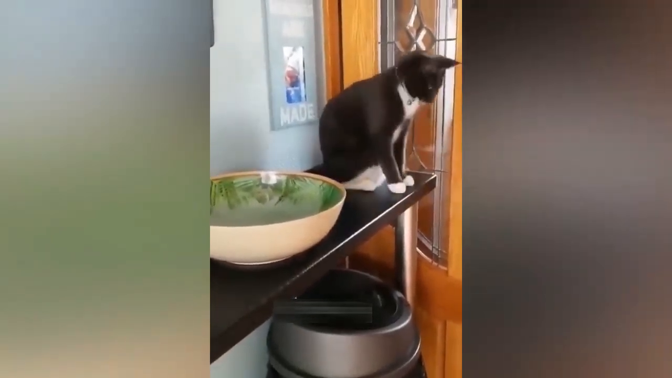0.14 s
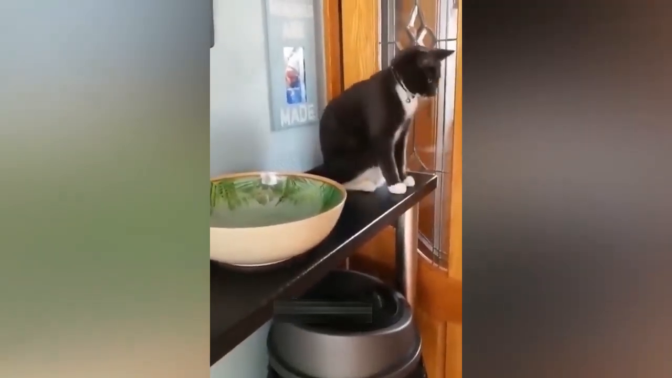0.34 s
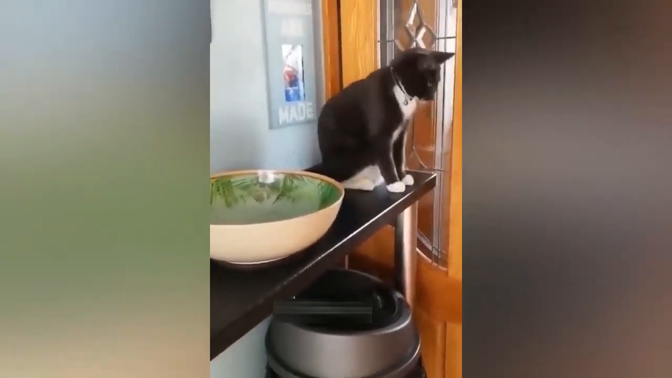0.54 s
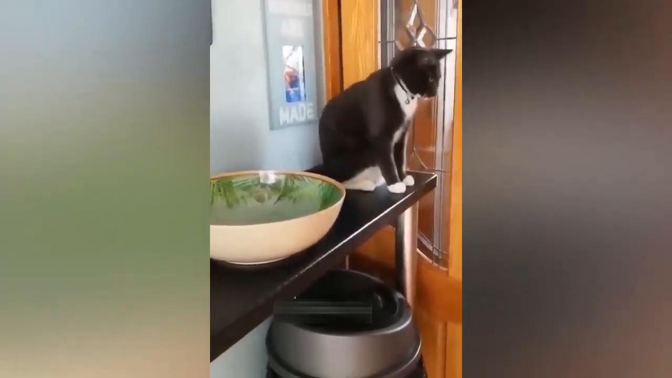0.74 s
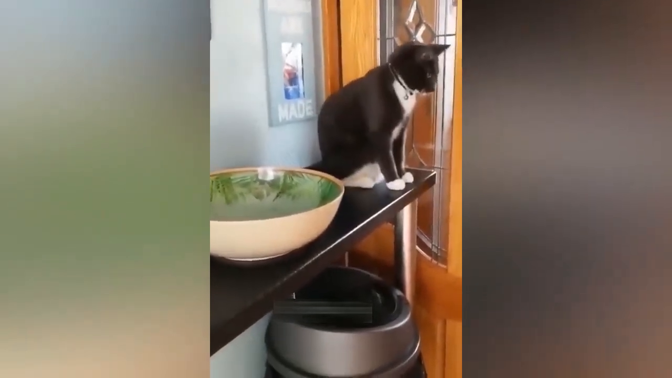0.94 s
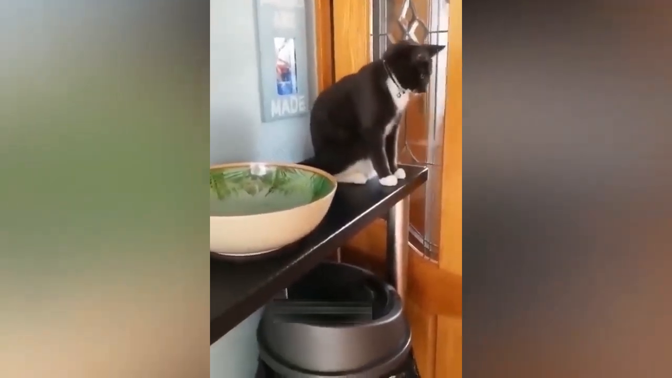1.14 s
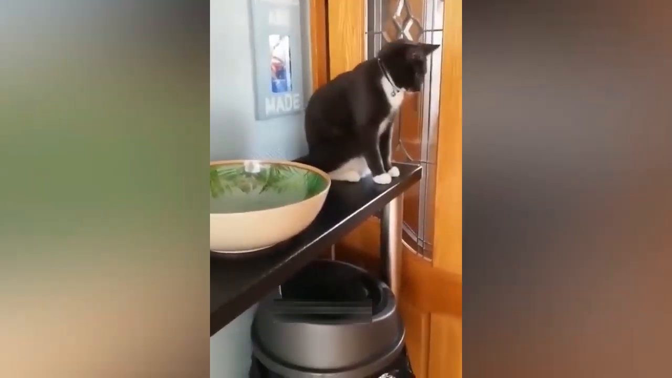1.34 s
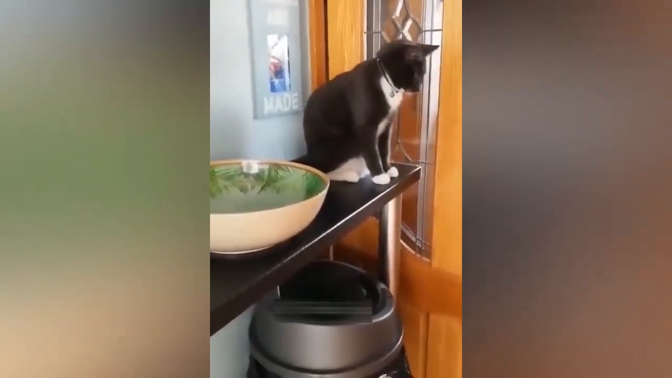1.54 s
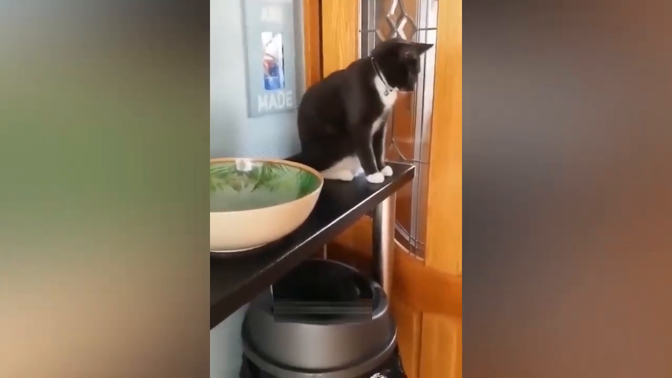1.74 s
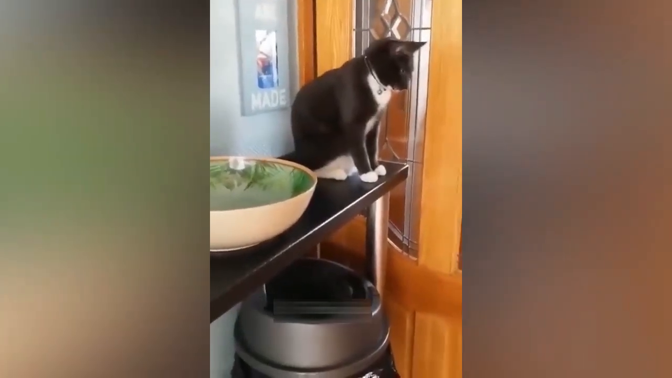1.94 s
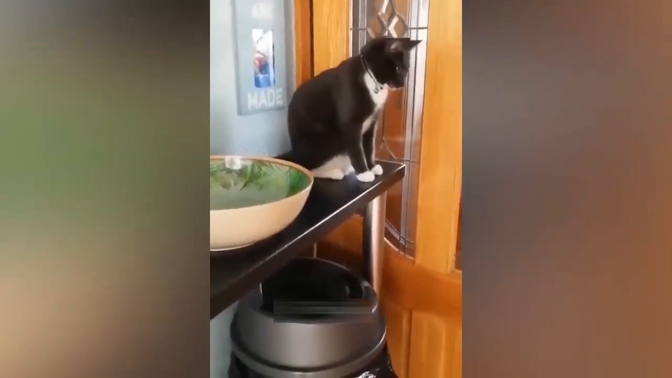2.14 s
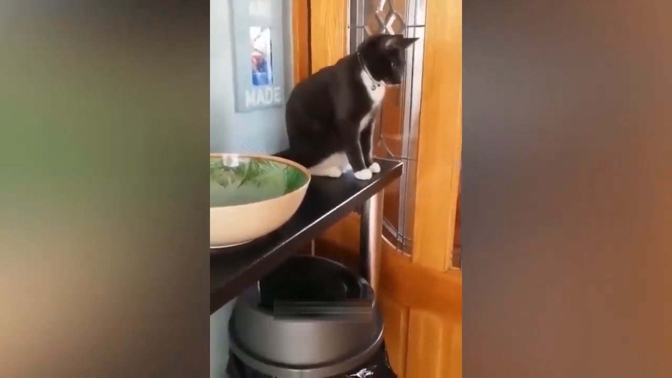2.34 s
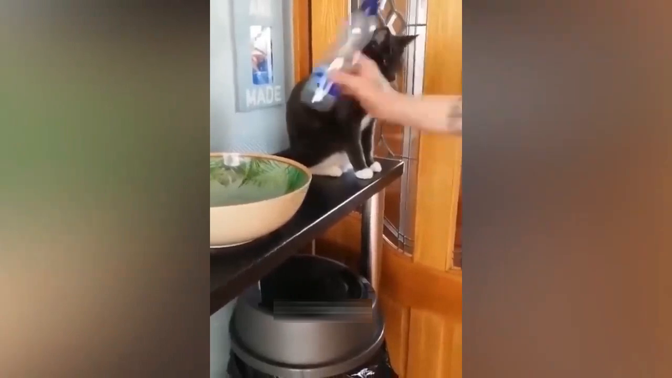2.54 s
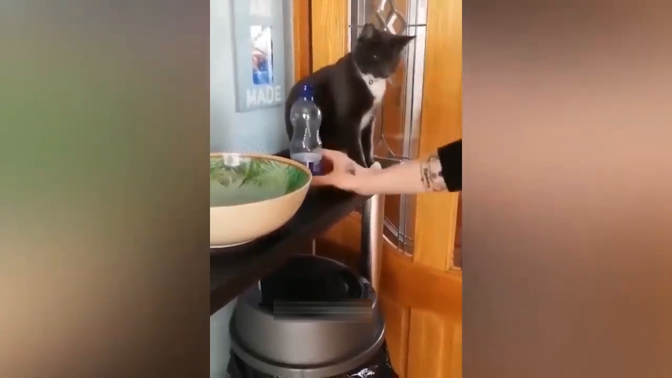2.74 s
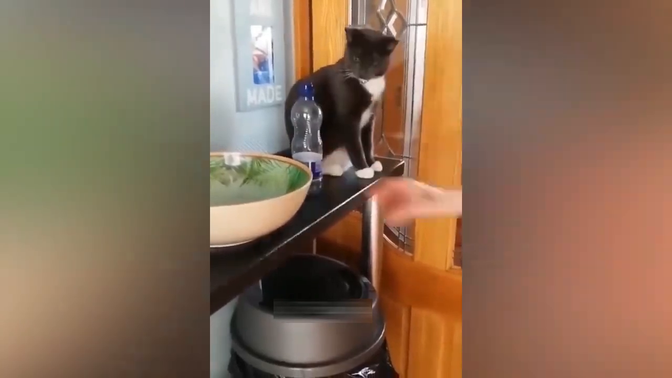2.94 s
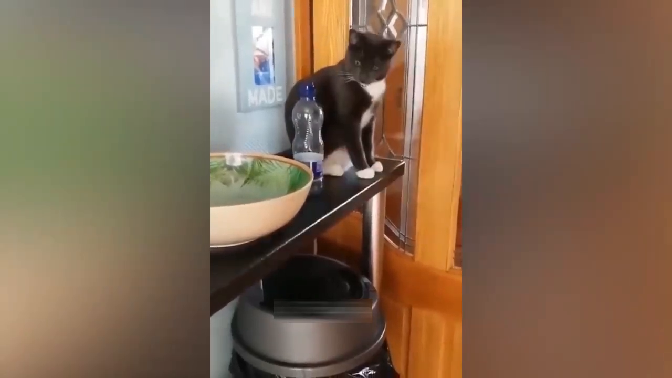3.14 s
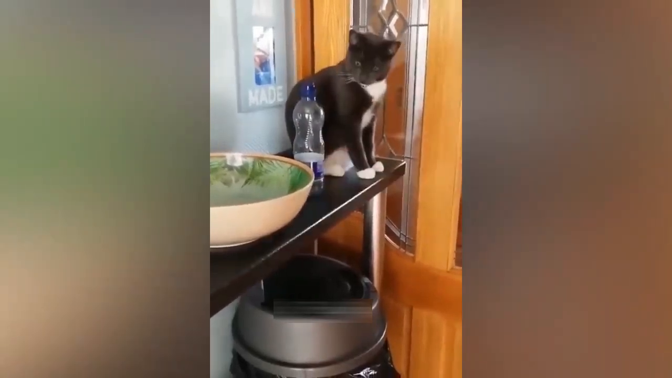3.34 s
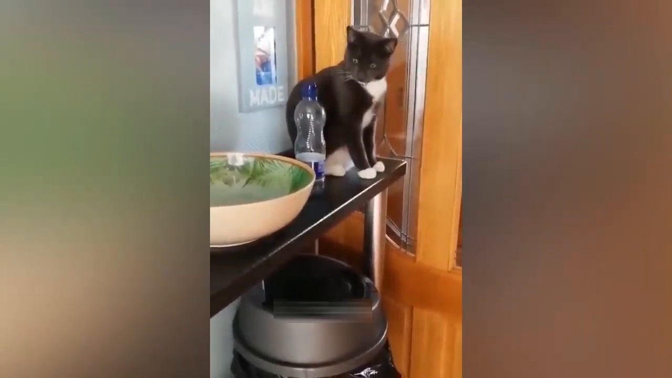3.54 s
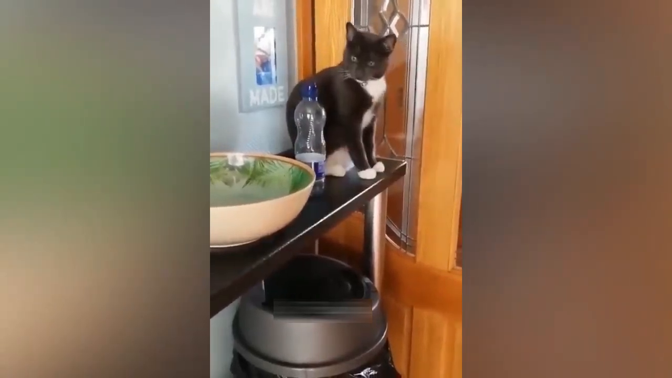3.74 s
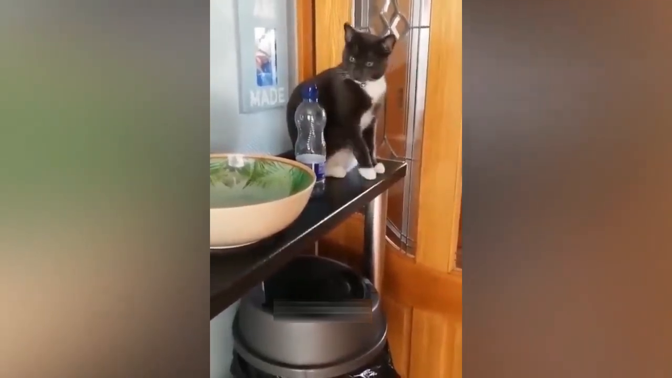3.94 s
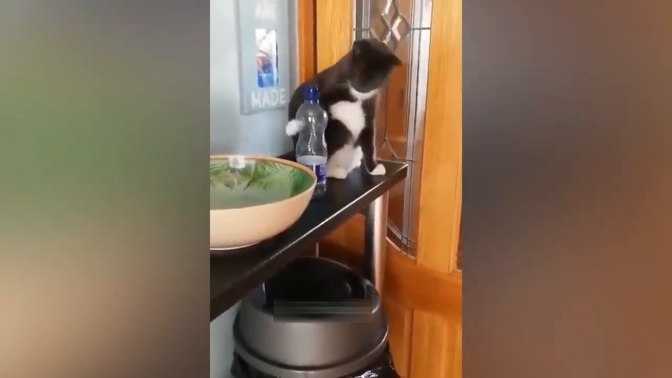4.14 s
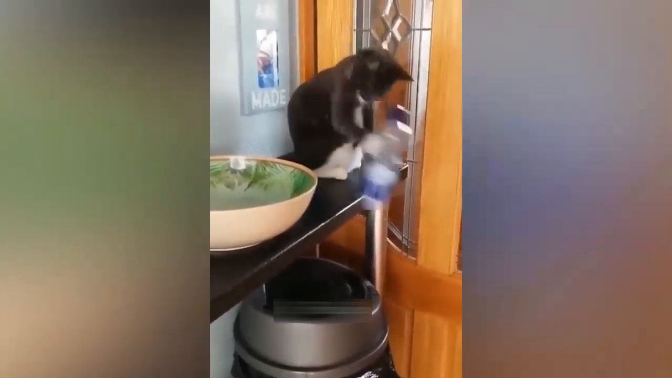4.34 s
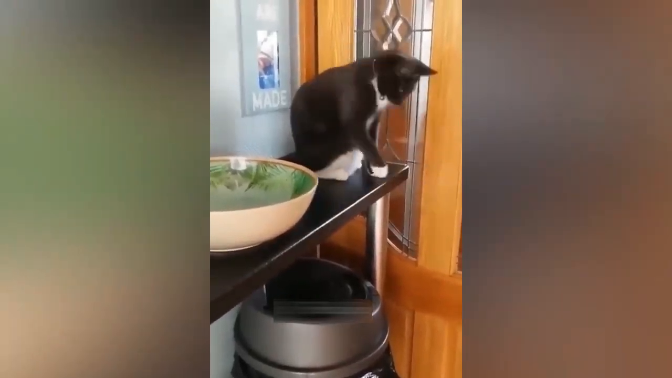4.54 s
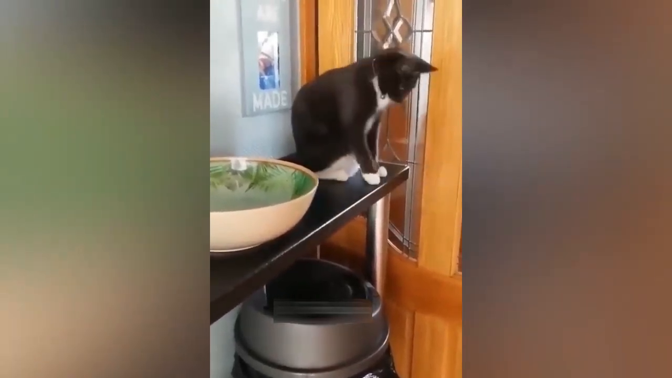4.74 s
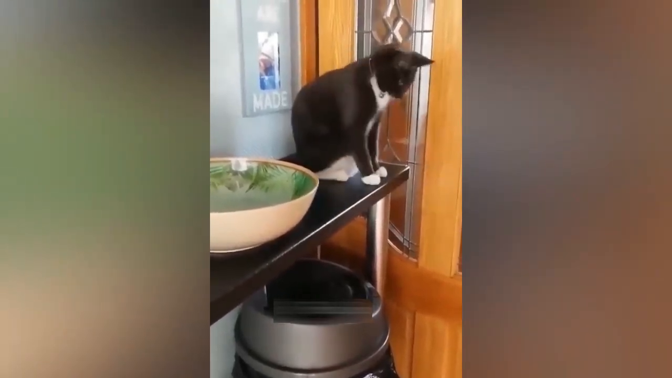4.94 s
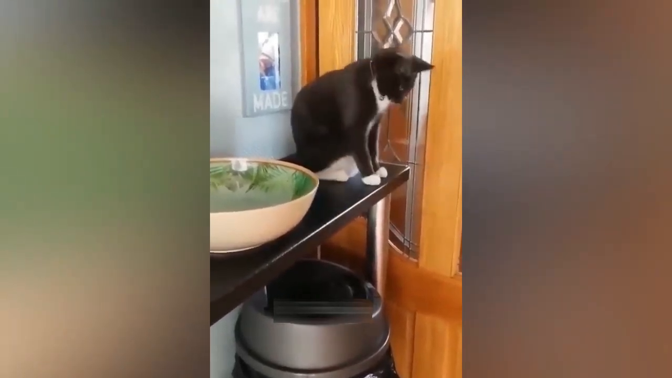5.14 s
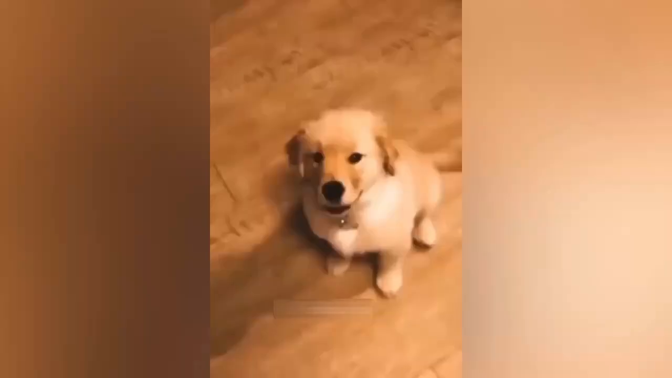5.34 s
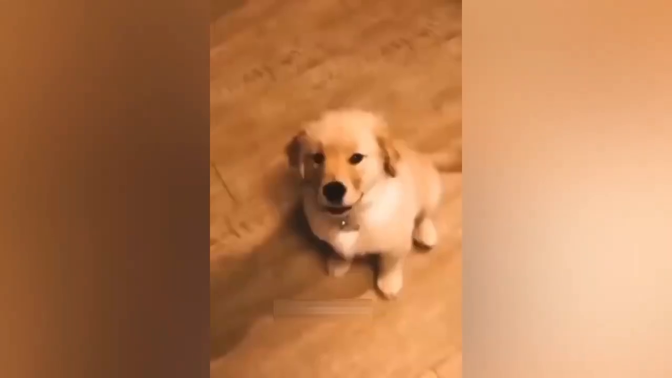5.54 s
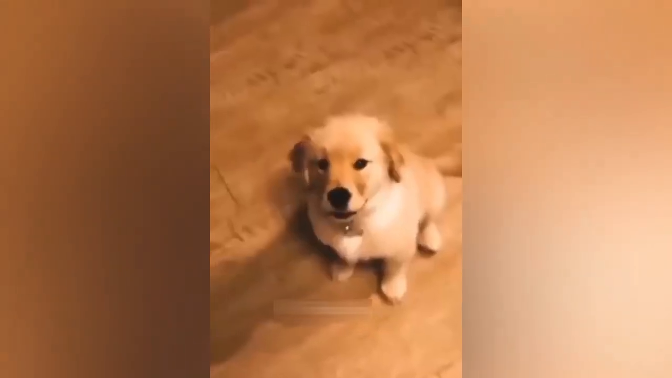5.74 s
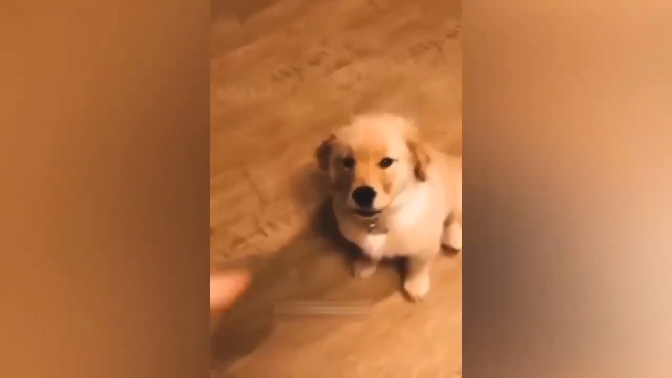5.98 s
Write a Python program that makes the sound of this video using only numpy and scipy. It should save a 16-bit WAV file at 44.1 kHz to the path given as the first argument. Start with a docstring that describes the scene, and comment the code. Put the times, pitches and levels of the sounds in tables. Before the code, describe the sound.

A plastic water bottle knocks, falls and rolls in a kitchen, is set down, falls again, then a hand rubs the microphone.

```python
"""A part-filled plastic bottle knocks on a shelf in a hard-walled kitchen, drops, rolls and is stood up
again; then a cat paws it off and it bounces on the floor. Each impact crumples the thin wall and excites
damped modes, while an air pocket resonates in the sloshing water. After a short silence, in another room
and in mono, a hand fumbles with stick-slip friction on the microphone's case and a collar tag rings."""
import sys
import numpy as np
from scipy import signal
from scipy.fft import rfft, irfft, next_fast_len
from scipy.io import wavfile
from scipy.ndimage import uniform_filter1d

SR = 44100
rng = np.random.default_rng(int(sys.argv[2]) if len(sys.argv) > 2 else 0)


def store_wav(level_fs):
    """Save 16-bit WAV to argv[1]."""
    pcm = np.round(np.clip(np.atleast_2d(level_fs), -1, 1) * 32767)
    wavfile.write(sys.argv[1], SR, pcm.T.astype(np.int16))


N = 265041
TIME = np.arange(N) / SR
EVENT_SIZE = SR // 2
AGE = TIME[:EVENT_SIZE]  # seconds since the onset of one event
ROLL_START_S, ROLL_END_S = 0.69, 1.62

# Coherence of the reverberant field. Each row: frequency in Hz, left-right correlation.
KITCHEN_COHERENCE = [(170, 0.97), (290, 0.88), (600, -0.17), (1400, 0.16), (4000, 0.017), (12000, 0.49)]
# Coherence of the background noise and the swilling water, with the same columns.
AIR_COHERENCE = [(100, 1), (290, 0.97), (640, 0.018), (3000, 0.038), (8000, 0.13), (14000, 1)]


def bottle_impacts(hits, spectrum, modes, lag_ms, pan_db, spread, wall_db, dent_q):
    """Impact excitation: direct sound, reverberation and the struck body's free vibration superpose."""
    # Each hit: start in seconds; level, bass and treble in dB; crumple T60 in seconds; room and ring
    # gains in dB; dent resonance in Hz, its gain in dB; most strongly driven frequency in Hz, its gain in dB.
    # Each spectrum row: frequency in Hz, relative level in dB.
    # Each mode: frequency in Hz, level in dB, T60 in seconds, phase lead of the left side in radians.
    out, tail = np.zeros((2, N)), kitchen_tail()
    swell = 1 - np.exp(-AGE / 0.0062)  # the modes build up over a few milliseconds
    for (start, level_db, bass_db, treble_db, crumple_t60, room_db, ring_db,
         dent_hz, dent_db, struck_hz, struck_db) in hits:
        source = coloured(contact(crumple_t60) + from_db(wall_db) * wall_ring(t60=0.06), spectrum)
        # near surfaces scatter the treble differently for each side
        scatter = np.array([crackle(crumple_t60, grain_db=4.0) for side in range(2)])
        scatter = coloured(shelved(scatter, bass_db=-30, treble_db=0, bass_hz=1200), spectrum)
        left = np.interp(AGE - lag_ms / 1000, AGE, source, left=0)
        direct = (np.array([left, source]) + spread * scatter) / np.hypot(1, spread)
        pan = from_db([[pan_db / 2], [-pan_db / 2]])
        sound = pan * direct + from_db(room_db) * reverberated(source, tail)
        for hz, db, t60, lead in modes:
            # each standing wave reaches the two sides out of step
            phase = rng.uniform(0, 2 * np.pi) + np.array([[lead], [0]])
            phase += 0.3 * rng.standard_normal((2, 1))
            # the point of contact favours a few neighbouring modes
            favour_db = struck_db * np.exp(-(np.log(hz / struck_hz) / 0.05) ** 2)
            mode = np.sin(2 * np.pi * hz * AGE + phase) * swell * decay(t60)
            sound += from_db(db + ring_db + favour_db) * np.sqrt(2) * unit_energy(mode)
        sound = resonant(shelved(sound, bass_db, treble_db), dent_hz, dent_db, q=dent_q)
        add(out, start, from_db(level_db) * sound)
    return out


def shelf_knocks():
    """Modal vibration: bottle and shelf ring at their natural frequencies after each knock."""
    # Blows, contact spectrum and modes, with the columns given in bottle_impacts.
    hits = [(0.2150, 8.5, 0.5, 1, 0.035, 3, -8, 3840, 11, 201, 12.5),
            (0.2203, 8, -0.5, -2.5, 0.0058, -1.5, -5, 2040, 8, 1207, 11),
            (0.2300, -4, -12, -13, 0.02, 6, 2.5, 2700, 16.5, 804, 20.5),
            (2.8050, 16.5, -1, -9.5, 0.038, 0.5, -6.5, 331, 7.5, 520, 9),
            (2.8095, 11.5, 3, -19, 0.011, -7, -12, 279, 6, 335, 10)]
    spectrum = [(60, -21.5), (140, -24.5), (200, -10.5), (290, 3.5), (410, -5.5), (520, -1), (800, -7.5),
                (1300, -7), (1850, -4), (2450, -12), (4200, -10.5), (7000, -15), (10500, -8.5),
                (15500, -19)]
    modes = [(205, -10, 0.036, 0.5), (308, -13.5, 0.019, 0.5), (336.7, -9.5, 0.19, -1.7),
             (509, -11.5, 0.18, 0.8), (804, -13.5, 0.29, 2.5), (1210, -8, 0.31, 3), (1857, -24, 0.22, 5.5),
             (2060, -26, 0.22, -1), (2230, -24, 0.2, -5), (2719, -15, 0.22, 10), (3850, -33, 0.15, 3)]
    return bottle_impacts(hits, spectrum, modes,
                          lag_ms=0.027, pan_db=0.5, spread=1.0, wall_db=-7.5, dent_q=21.0)


def floor_bounces():
    """Modal vibration: each landing on the floor excites closely spaced midrange modes."""
    # Blows, contact spectrum and modes, with the columns given in bottle_impacts.
    hits = [(0.5295, 4, -20, 3.5, 0.0091, 8.1, 0, 3140, 3.2, 1198, 21.8),
            (0.5335, 4, -0.5, -7, 0.017, 9.4, 5, 2800, 6.2, 1670, 8.5),
            (4.8698, 11.5, -12, 3.5, 0.039, 5.9, -13, 3040, 6, 1790, 5),
            (4.8780, 8, 2.5, -6.5, 0.0069, 5.8, -7, 2900, 7.9, 840, 14.5),
            (5.0318, -2.3, 15.5, 0, 0.0061, 1.7, 5.5, 1450, 5, 855, 6),
            (5.080, -14, 15.5, 3.5, 0.1, 3.6, 4, 870, 3, 855, 7),
            (5.2730, -6.5, 11, 13, 0.0034, 4.2, 1, 1800, 1.2, 680, 16)]
    spectrum = [(88, -98), (150, -88), (275, -28.5), (524, -15), (675, -1.5), (871, 1), (998, -11),
                (1170, -6), (1690, 2), (2270, -7), (4670, -13.5), (5050, -15.5), (11700, -18), (14800, -23),
                (16000, -80)]
    modes = [(686, -14, 0.36, -2.5), (730, -18, 0.3, -2.6), (782, -20, 0.3, -2.6), (842, -15.5, 0.3, -2.1),
             (864, -15, 0.38, -2.5), (1198, -16.5, 0.22, -1.5), (1366, -13.5, 0.3, -0.3),
             (1414, -14, 0.3, -1.8), (1450, -15, 0.26, 2.0), (1648, -14.5, 0.26, -1.0),
             (1777, -14, 0.28, -0.9), (1995, -14, 0.2, 0), (2153, -14, 0.25, -0.5),
             (2925, -14.5, 0.3, -0.8)]
    return bottle_impacts(hits, spectrum, modes,
                          lag_ms=0.21, pan_db=3.5, spread=0.97, wall_db=-17, dent_q=15.3)


def wall_snaps(dent_hz=10440, dent_db=9):
    """Buckling: the thin wall snaps, or the cap ticks, exciting high, heavily damped modes."""
    # Each row: start in seconds; level, bass and treble in dB; crumple T60 in seconds; room gain in dB.
    snaps = [(0.5319, 1.5, -12, -15, 0.035, 3), (0.650, -14, -10, -4, 0.071, 11.5),
             (0.767, -30.5, 27.5, 1, 0.12, 8.5), (0.888, -16, 14, 5, 0.068, 2),
             (0.978, -25, -8, 0.5, 0.1, 1), (1.052, -39, -8, -6, 0.02, -4),
             (1.603, -17, -5, -16, 0.035, 7.5), (2.9547, 3.5, -20, 1.5, 0.012, -2.5),
             (4.289, -16.5, -9, -35, 0.093, 5.5), (5.0328, -4.5, -15, 0, 0.02, 2),
             (5.176, -14, -3, -7, 0.11, 6), (5.206, -7.5, 11.5, -8.5, 0.019, 8),
             (5.364, -31, -8, -0.5, 0.3, 20)]
    # A snap's spectrum and the wall's modes, with the columns given in bottle_impacts.
    spectrum = [(240, -16.5), (400, -8), (2430, -5), (3070, -5), (4050, -3.5), (4800, -4.5), (5780, -0.5),
                (11800, -2), (16000, -3)]
    modes = [(1914, -14.5, 0.014, 0.5), (4580, -10, 0.011, 0.9), (9130, -14, .06, -1.3),
             (11700, -8, 0.023, 0.52)]
    hits = [(*snap, 0, dent_hz, dent_db, dent_hz, 0) for snap in snaps]
    return bottle_impacts(hits, spectrum, modes,
                          lag_ms=0, pan_db=0.5, spread=1.0, wall_db=-4.0, dent_q=6.3)


def contact(t60, push_db=-9, crossover_hz=900):
    """Impulsive force: one clean push carries the lows; the crumpling wall adds micro-snaps above."""
    snaps = butterworth(crackle(t60, grain_db=3.5), 2, crossover_hz, "high")
    push = shelved(signal.unit_impulse(EVENT_SIZE), -push_db, 0, bass_hz=crossover_hz)
    return snaps + from_db(push_db) * push


def wall_ring(t60, low_hz=1500, high_hz=14000, count=36):
    """High modal density: each blow excites a different set of the ribbed wall's many modes."""
    lines = np.zeros(EVENT_SIZE // 2 + 1, complex)
    mode_hz = rng.uniform(low_hz, high_hz, count)
    lines[(mode_hz / 2).astype(int)] = 1j * rng.standard_normal(count)  # bins are 2 Hz apart
    return unit_energy(irfft(lines) * decay(t60))


def water(pocket_hz=300.5, pitch_scatter=0.13, small_gulps_per_s=22):
    """Sloshing: the moving water excites its air pocket in gulps, over a low swilling noise."""
    # Each row: start in seconds, peak in dB, pitch in Hz, swell in seconds, glide in octaves per second.
    main_gulps = [(0.405, -25.5, 284, 0.0045, 0.5), (0.48, -24.5, 294, 0.0059, -4),
                  (0.508, -24.5, 286, 0.0095, 0.5), (1.054, -37, 281, 0.013, -5),
                  (1.166, -34, 269, 0.0099, 2), (1.191, -36, 268, 0.021, 0), (1.230, -35, 260, 0.012, 2),
                  (1.289, -32, 284, 0.0063, -1), (1.757, -34.5, 290, 0.005, 8),
                  (2.915, -65, 716, 0.035, -10), (3.097, -35.5, 323, 0.0073, 3),
                  (3.185, -36, 266, 0.0045, 2), (3.265, -36.5, 270, 0.0047, 0),
                  (3.330, -37, 374, 0.0084, 1), (3.494, -37, 326, 0.0066, -1)]
    # Spectrum of the swilling. Each row: frequency in Hz, relative level in dB.
    spectrum = [(60, -22), (120, -46), (200, -18.5), (265, -4), (335, -2.5), (430, -10.5), (700, -25.5),
                (2000, -32), (12000, -96)]
    gulps, motion = np.zeros(N), agitation()
    for start, peak_db, hz, swell_s, glide in main_gulps:
        add(gulps, start, from_db(peak_db) * gulp(hz, swell_s, glide))
    chance, detune = rng.random(N), rng.standard_normal(N)
    for i in np.flatnonzero(chance < small_gulps_per_s / SR):
        hz = pocket_hz * np.exp(pitch_scatter * detune[i])
        add(gulps, TIME[i], from_db(5) * motion[i] * gulp(hz, swell_s=0.0069))
    reverberation = from_db(-9) * reverberated(gulps, kitchen_tail())
    swill = from_db(-3) * motion * coloured(stereo_noise(AIR_COHERENCE, N), spectrum)
    return gulps + reverberation + swill


def gulp(hz, swell_s, glide=0):
    """Air-pocket resonance: a tone swells, rings for a few cycles and may slide in pitch."""
    swell = (AGE / swell_s * np.exp(1 - AGE / swell_s)) ** 2
    pitch_hz = hz * 2 ** (glide * AGE)
    return swell * np.sin(2 * np.pi * np.cumsum(pitch_hz) / SR)


def agitation(rise_s=0.009, settle_db_per_s=16):
    """Energy summation: the water's amplitude of motion follows from all jolts, each draining away."""
    # Jolts of the bottle. Each row: start in seconds, level in dB.
    jolts = [(0, -49.5), (0.399, -49.5), (0.55, -40.5), (0.72, -48.5), (1.16, -43.5), (1.729, -44.5),
             (2.98, -46.5), (4.29, -44.5), (4.45, -48.5)]
    energy = np.zeros(N)
    for start, db in jolts:
        age = np.maximum(TIME - start, 0)
        energy += (from_db(db - settle_db_per_s * age) * (1 - np.exp(-age / rise_s))) ** 2
    return np.sqrt(energy)


def rolling(friction, level_db=-45.5, fade_db_per_s=6.0):
    """Rolling friction: the noise fades as the bottle slows, until it is picked up."""
    # Spectrum of the roll. Each row: frequency in Hz, relative level in dB.
    spectrum = [(500, 7.5), (1200, 6), (2500, 1), (6000, -2), (10500, -7), (13000, -3.5), (16000, -22)]
    level = from_db(level_db - fade_db_per_s * (TIME - ROLL_START_S))
    envelope = stroke(ROLL_START_S, ROLL_END_S, attack_s=0.037, release_s=0.14)
    return level * envelope * coloured(friction, spectrum)


def cap_rattle(per_s=20, scatter_db=5, level_db=-50, fade_db_per_s=7, burst_t60=0.05, room_t60=0.3):
    """Random collisions: the cap's loose ring chatters during the roll; the room prolongs each burst."""
    # Spectrum of the chatter. Each row: frequency in Hz, relative level in dB.
    spectrum = [(1500, -17), (6000, -12), (10200, 10), (13000, -5), (16000, -10)]
    chance, sizes = rng.random(N), rng.standard_normal(N)
    ticks = unit_rms((chance < per_s / SR) * from_db(scatter_db * np.clip(sizes, -2, 1)))
    ticks *= from_db(level_db - fade_db_per_s * (TIME - ROLL_START_S))
    ticks *= (TIME > ROLL_START_S) & (TIME < ROLL_END_S)
    burst_power = (unit_energy(decay(burst_t60)) ** 2 + unit_energy(decay(room_t60)) ** 2) / 2
    envelope = np.sqrt(np.maximum(signal.oaconvolve(ticks ** 2, burst_power)[:N], 0))
    return envelope * coloured(stereo_noise(KITCHEN_COHERENCE, N), spectrum)


def scuffing(friction):
    """Sliding friction: a sleeve brushes past, and the bottle slides off the shelf."""
    # Each row: centre in seconds, level in dB, width in seconds, treble in dB, resonance in Hz,
    # its gain in dB.
    scuffs = [(3.346, -44.5, 0.06, 8, 1930, 9), (4.465, -57, 0.063, 13.5, 3960, 11),
              (4.505, -44, 0.021, 14, 1220, 8.5), (4.537, -44, 0.052, 6, 4300, 13)]
    # Spectrum of a scuff. Each row: frequency in Hz, relative level in dB.
    spectrum = [(290, -61), (500, -3), (906, -5.5), (1230, 1.5), (1480, -9), (2390, -12), (3810, -15),
                (5240, -22), (10700, -19), (14500, -26), (16000, -55)]
    out, rub = np.zeros((2, N)), coloured(friction, spectrum)
    for centre, db, width, treble_db, hz, gain_db in scuffs:
        near = np.abs(TIME - centre) < 0.5
        envelope = from_db(db) * np.exp(-((TIME[near] - centre) / width) ** 2)
        out[:, near] += envelope * resonant(shelved(rub[:, near], 0, treble_db), hz, gain_db)
    return out


def fumbling():
    """Stick-slip friction: skin drags over the microphone's case and the fingers catch on it."""
    # Strokes of the skin. Each row: start in seconds, length in seconds, level in dB.
    drags = [(5.539, 0.087, -41.5), (5.752, 0.095, -29), (5.845, 0.14, -35), (5.995, 0.055, -19)]
    # Each row: start in seconds; level, bass and treble in dB; T60 in seconds; resonance in Hz.
    catches = [(5.556, 2.5, -22, -9.5, 0.083, 4560), (5.6, -8, 5, -3.5, 0.061, 5000),
               (5.7561, 4, 10.5, -26, 0.058, 2800), (5.765, 10, 1.5, -29, 0.14, 1020),
               (5.792, 6, 5, -25, 0.12, 1040), (5.777, 5.5, 6, -19, 0.03, 5000),
               (5.811, 7.5, 5, -13, 0.05, 5200), (5.838, 9.5, -11, -8, 0.09, 3870),
               (5.8769, 7.5, -4, -12, 0.014, 1000), (5.881, 6, -4, -23, 0.035, 1520),
               (5.8913, 5.5, 2, -20, 0.012, 2000), (5.909, -1, -3, -3, 0.013, 5260),
               (5.930, -11, 4, 11.5, 0.019, 8300), (5.945, -3, 0, 6, 0.05, 3500),
               (5.950, 4.5, 1, 2, 0.06, 5500), (5.958, 1.5, -6, 4.5, 0.025, 2600)]
    # Spectrum of the rubbed case. Each row: frequency in Hz, relative level in dB.
    spectrum = [(20, -14), (100, -6), (212, -6), (300, -9.5), (600, -5), (958, -3), (1850, -2.5),
                (2600, -1.5), (2850, -3.5), (5730, -2), (9000, -6.5), (11700, -46), (19800, -120)]
    slips = rng.standard_normal(N) * stick_slip(per_s=400, grain_db=4.0)
    envelope = sum(from_db(db) * stroke(start, start + length, attack_s=0.02, release_s=0.03)
                   for start, length, db in drags)
    out = envelope * coloured(slips, spectrum)
    tick = from_db(-12) * signal.unit_impulse(EVENT_SIZE)
    for start, db, bass_db, treble_db, t60, hz in catches:
        catch = unit_energy(crackle(t60, grain_db=4.5) + tick)
        scuff = shelved(coloured(catch, spectrum), bass_db, treble_db)
        add(out, start, from_db(db) * resonant(scuff, hz, gain_db=8, q=4.0))
    return out


def case_thuds():
    """Structure-borne sound: bumps of the hand travel through the case as low damped oscillations."""
    # Each row: start in seconds, amplitude in dB, frequency in Hz, T60 in seconds.
    thuds = [(5.598, -23, 260, 0.011), (5.7605, -10.5, 193, 0.034), (5.762, -35, 170, 0.81),
             (5.835, -18, 60, 0.022), (5.928, -15.5, 9, 0.29), (5.930, -18, 105, 0.022),
             (5.952, -15.5, 92, 0.033)]
    return struck_modes(thuds)


def collar_tag():
    """Free vibration: the struck tag rings in two high, lightly damped modes."""
    # Each row: start in seconds, amplitude in dB, frequency in Hz, T60 in seconds.
    modes = [(5.757, -28, 5859, 0.65), (5.757, -40, 8650, 0.5)]
    return struck_modes(modes)


def mains_buzz(hz=58.4, buzz_db=-54, hiss_db=-43.5, steady_share=0.37):
    """Periodic interference: each mains cycle brings a low pulse and a spit of hiss."""
    buzz = unit_rms(butterworth(signal.sawtooth(2 * np.pi * hz * TIME), 3, 400))
    spits = steady_share + (1 - steady_share) * np.cos(np.pi * hz * TIME) ** 10
    return from_db(buzz_db) * buzz + from_db(hiss_db) * spits * rng.standard_normal(N)


def kitchen_tail(build_s=0.00043):
    """Diffuse reverberation: dense reflections build up quickly and decay band by band."""
    # Reverberation time. Each row: frequency in Hz, T60 in seconds.
    t60s = [(100, 0.6), (260, 0.11), (700, 0.53), (1800, 0.36), (5000, 0.35), (13000, 0.27)]
    noise = rfft(stereo_noise(KITCHEN_COHERENCE, EVENT_SIZE))
    hz, edges = np.fft.rfftfreq(EVENT_SIZE, 1 / SR), np.geomspace(1, SR / 2, 19)
    tail = sum(irfft(noise * (hz >= low) * (hz < high)) * decay(at_hz(t60s, np.sqrt(low * high)))
               for low, high in zip(edges, edges[1:]))
    onset, fade = 1 - np.exp(-AGE / build_s), np.cos(np.pi * AGE)
    return whitened(tail * onset, bins=70) * fade


def kitchen_air(level_db=-48):
    """Stationary noise: the kitchen's steady background, strongest in the bass."""
    # Each row: frequency in Hz, relative level in dB.
    spectrum = [(18, -60), (30, -29), (79, -5.5), (124, -4.5), (157, -17), (233, 0), (319, -6.5),
                (540, -7.5), (600, -13.5), (666, -10), (844, -11.5), (1160, -8), (2120, -18), (6000, -25.5),
                (12000, -27), (15000, -37.5), (16000, -29)]
    return from_db(level_db) * coloured(stereo_noise(AIR_COHERENCE, N), spectrum)


def crackle(t60, grain_db):
    """Crackling noise: a dying flurry of uneven micro-snaps, of unit energy."""
    noise, sizes = rng.standard_normal((2, EVENT_SIZE))
    return unit_energy(noise * from_db(grain_db * sizes) * decay(t60))


def stick_slip(per_s, grain_db):
    """Stick-slip modulation: a gain of unit RMS that jumps about many times a second."""
    steps = rng.standard_normal(N)
    return unit_rms(from_db(grain_db * np.interp(TIME * per_s, np.arange(N), steps)))


def struck_modes(rows):
    """Superposition of damped sinusoids, each with its own onset."""
    out = np.zeros(N)
    for start, db, hz, t60 in rows:
        add(out, start, from_db(db) * np.sin(2 * np.pi * hz * AGE) * decay(t60))
    return out


def stroke(start_s, end_s, attack_s, release_s):
    """First-order envelope: it rises at the start, holds, and dies away after the end."""
    attack = 1 - np.exp(-np.maximum(TIME - start_s, 0) / attack_s)
    return attack * np.exp(-np.maximum(TIME - end_s, 0) / release_s)


def decay(t60):
    """Exponential damping: 60 dB in t60 seconds."""
    return np.exp(-np.minimum(np.log(1000) * AGE / t60, 40))


def stereo_noise(coherence, size):
    """Partial coherence: mid and side white noise mix to a frequency-dependent correlation."""
    padded = next_fast_len(size, real=True)
    alike = np.clip(at_hz(coherence, np.fft.rfftfreq(padded, 1 / SR)), -.999, .999)
    mid, side = rfft(rng.standard_normal((2, padded)))
    spectra = np.sqrt((1 + alike) / 2) * mid + np.sqrt((1 - alike) / 2) * side * [[1], [-1]]
    return irfft(spectra, padded)[:, :size]


def reverberated(x, tail):
    """Convolution of a mono sound with a stereo impulse response."""
    return signal.fftconvolve(x[None], tail, axes=-1)[:, :len(x)]


def coloured(x, spectrum, size=4096):
    """Minimum-phase filtering to the given spectrum; white noise keeps its power."""
    cepstrum = irfft(np.log(from_db(at_hz(spectrum, np.fft.rfftfreq(size, 1 / SR)))))
    one_sample_delay = np.exp(-2j * np.pi * np.fft.rfftfreq(size))
    log_response = rfft(2 * cepstrum[1:size // 2], size) * one_sample_delay
    response = unit_energy(irfft(np.exp(log_response)))
    return signal.oaconvolve(x, np.array(response, ndmin=x.ndim), axes=-1)[..., :x.shape[-1]]


def whitened(x, bins):
    """Spectral whitening: energy is evened over frequency, keeping detail finer than the given bins."""
    spectrum = rfft(x)
    power = np.mean(np.abs(spectrum) ** 2, axis=0)
    return irfft(spectrum / np.sqrt(uniform_filter1d(power, bins) + 1e-12))


def shelved(x, bass_db, treble_db, bass_hz=450, treble_hz=3000):
    """Spectral tilt: a heavier contact has more bass, a harder one more treble."""
    bass, treble = butterworth(x, 1, bass_hz), butterworth(x, 1, treble_hz, "high")
    return x + (from_db(bass_db) - 1) * bass + (from_db(treble_db) - 1) * treble


def resonant(x, hz, gain_db, q=9.1):
    """Resonance: one band is lifted out of the sound."""
    band = signal.lfilter(*signal.iirpeak(min(hz, SR / 3), q, fs=SR), x)
    return x + (from_db(gain_db) - 1) * band


def butterworth(x, order, hz, kind="low"):
    """Maximally flat filtering."""
    return signal.sosfilt(signal.butter(order, hz, kind, fs=SR, output="sos"), x)


def low_pass(x, hz):
    """Band limiting by a steep elliptic filter."""
    return signal.sosfilt(signal.ellip(10, .3, 80, hz, fs=SR, output="sos"), x)


def at_hz(points, hz):
    """Interpolation on a logarithmic frequency axis."""
    frequencies, values = np.transpose(points)
    return np.interp(np.log(np.maximum(hz, 1)), np.log(frequencies), values)


def add(out, start_s, sound):
    """Superposition of a sound on the track."""
    start = round(start_s * SR)
    part = out[..., start:start + sound.shape[-1]]
    part += sound[..., :part.shape[-1]]


def from_db(db):
    return 10 ** (np.asarray(db) / 20)


def unit_rms(x):
    return x / np.sqrt(np.mean(x ** 2) + 1e-20)


def unit_energy(x):
    return x / np.sqrt(np.sum(x ** 2) + 1e-20)


def scene(kitchen_end_s=5.503, fumble_start_s=5.553):
    """Sources superpose in the kitchen and, after a moment of silence, in the other room."""
    impacts = shelf_knocks() + floor_bounces() + wall_snaps()
    air, slosh = kitchen_air(), water()
    friction = stereo_noise(KITCHEN_COHERENCE, N) * stick_slip(per_s=130, grain_db=1.5)
    kitchen = impacts + slosh + rolling(friction) + cap_rattle() + scuffing(friction) + air
    other_room = low_pass(fumbling() + case_thuds() + collar_tag() + mains_buzz(), hz=9000)
    return kitchen * (TIME < kitchen_end_s) + other_room * (TIME > fumble_start_s)


def record(dry):
    """Overload flattens the highest peaks, and band limiting cuts the top."""
    return low_pass(np.clip(dry, -1, 1), hz=15500)


dry = scene()
out = record(dry)
store_wav(out)
```